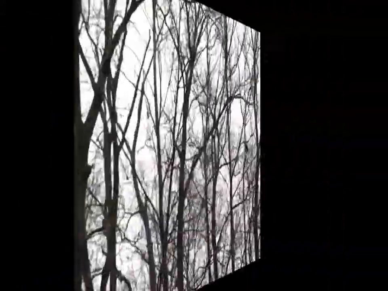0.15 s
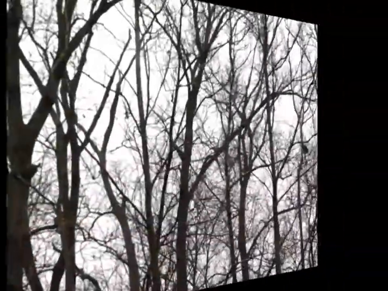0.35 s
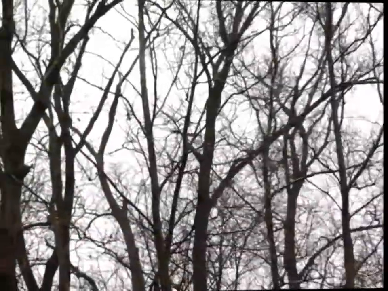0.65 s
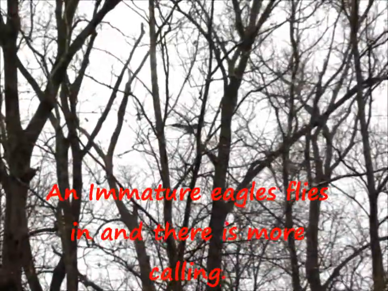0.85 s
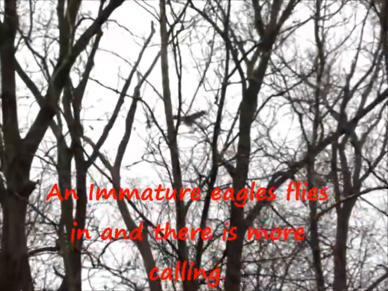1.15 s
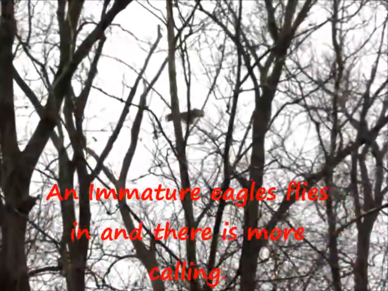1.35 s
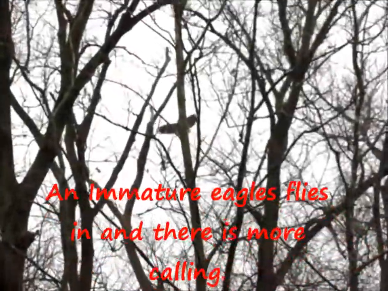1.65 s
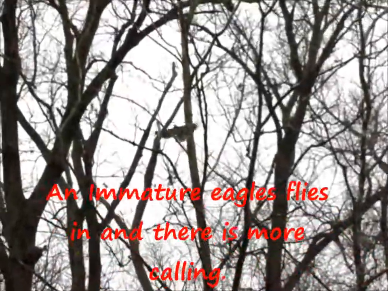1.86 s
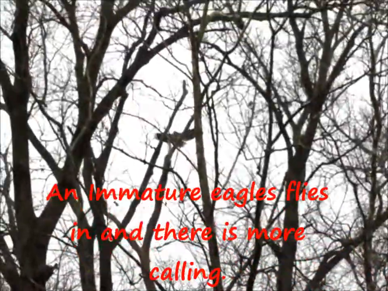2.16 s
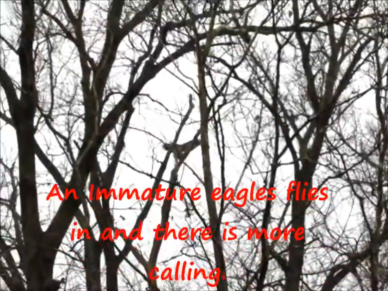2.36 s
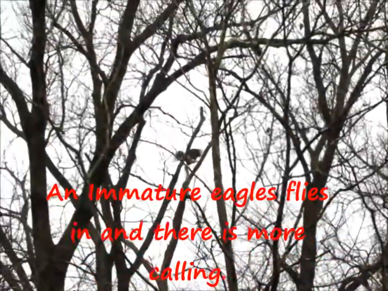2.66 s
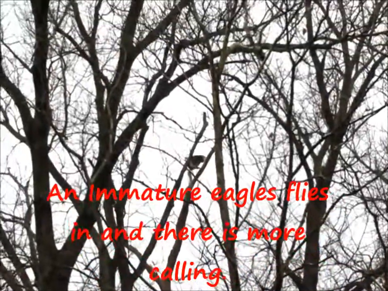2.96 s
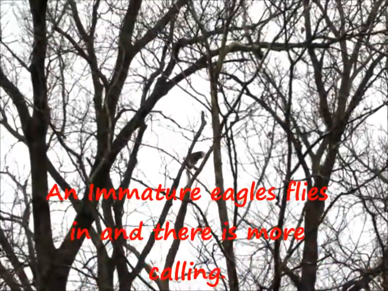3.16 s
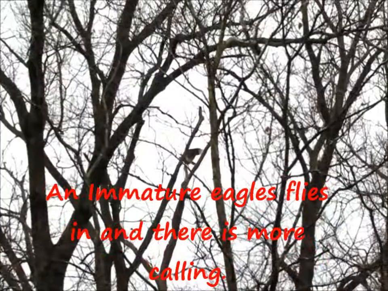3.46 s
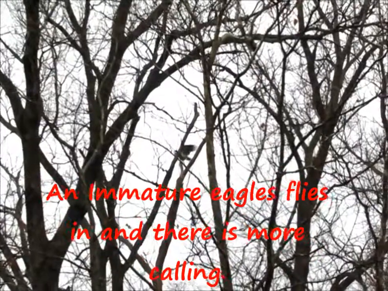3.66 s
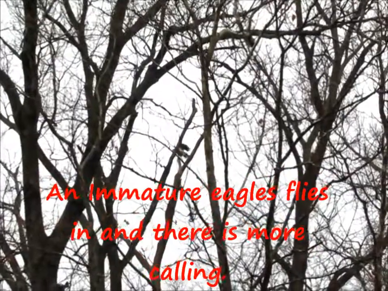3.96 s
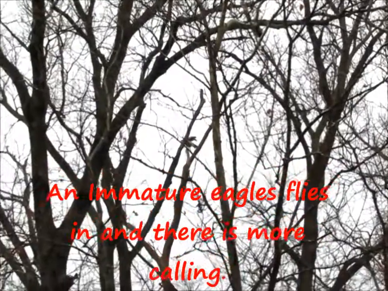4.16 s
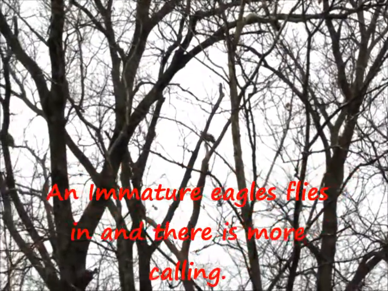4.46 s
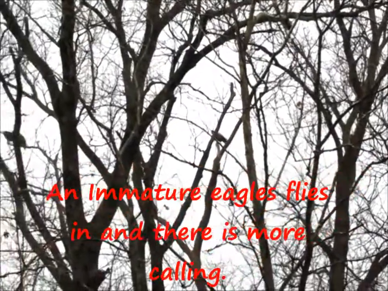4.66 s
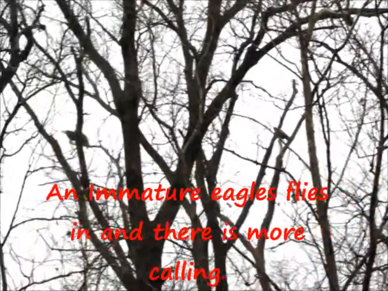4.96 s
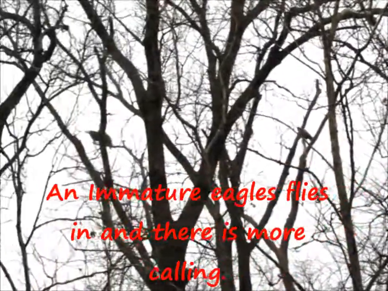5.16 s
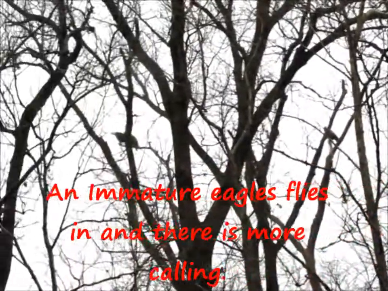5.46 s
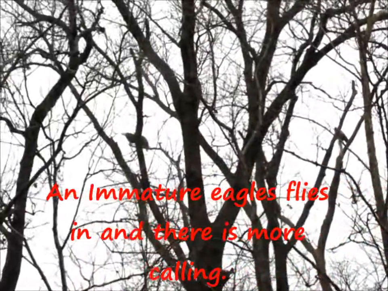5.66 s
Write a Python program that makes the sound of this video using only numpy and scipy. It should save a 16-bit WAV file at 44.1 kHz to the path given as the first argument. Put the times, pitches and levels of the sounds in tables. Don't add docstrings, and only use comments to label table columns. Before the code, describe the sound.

A broad, rushing motor whir starts at once, brightens at about 0.2 seconds and stops abruptly at 0.7, leaving a softer hiss until 1.6. An eagle's near-pure arched whistles, around 2 to 2.5 kHz, rise and fall at 0.2 and 0.7, then quicker broken strokes come around 1.0, 1.35 and 1.5, some led by low rising grace notes. Trunks return a diffuse, shimmering echo. Close dull knocks hit the hand-held camera from 1.2 to 1.8, with a sharp metallic click at 1.6; lighter bumps recur at 2.3 and between 4.1 and 5.3. Faint steady rain with fine drops and a low rumble remain. Quick high chatter runs from 2.45 to 2.85 and again from 3.9 to 4.5, pulses rising then dropping and weakening. A small bird chips faintly at 2.5 and near 4.0, followed by a thin falling buzz. Rain and rumble finish to 5.8.

```python
import sys
import numpy as np
from scipy import signal
from scipy.fft import rfft, irfft
from scipy.io import wavfile
from scipy.ndimage import uniform_filter1d

SR = 44100
rng = np.random.default_rng(int(sys.argv[2]) if len(sys.argv) > 2 else 0)


def to_wav(s):
    ch = np.atleast_2d(s).T
    pcm = np.round(np.clip(ch, -1, 1) * 32767)
    wavfile.write(sys.argv[1], SR, pcm.astype(np.int16))


def undo_db(level):
    steps = np.asarray(level, float) / 20
    return 10 ** steps


N = 256220

# pitch_hz, density_db (per Hz)
WHIR_SPECTRUM = [(35, -37), (60, -11), (102, -2), (152, -7), (521, -12), (810, -17), (1120, -10),
                 (1410, -0.5), (1830, -3), (3120, -4), (11700, -21.5), (13800, -59), (15500, -67)]
HISS_SPECTRUM = [(120, -50), (200, -12), (288, -9.5), (755, -7.5), (1170, -10.5), (1940, -2.5),
                 (2380, -4.5), (2850, -11), (11400, -17), (15500, -37)]
RAIN_SPECTRUM = [(120, -46), (200, 0), (211, -12.5), (273, -3), (470, -5.5), (812, -1.5), (1050, -4.5),
                 (1380, -4.5), (1940, -5), (2700, -8), (5790, -13.5), (14700, -21), (15500, -17)]
RUMBLE_SPECTRUM = [(16, -41), (28, -10), (49, -21), (59, -4), (102, -13.5), (120, 0.5), (139, -14),
                   (166, -7.5), (206, -16.5), (232, -20), (260, -18), (340, -40), (570, -120)]
# pitch_hz, width_hz, level_db
WHIR_PEAKS = [(830, 164, -46.5), (1476, 144, -44), (2250, 110, -50.5), (3030, 100, -50), (3840, 92, -53.5)]
RUMBLE_PEAKS = [(38.2, 14, -66.5), (86.2, 11, -57.5), (106.95, 1.8, -56.5)]
# time_s, level_db
WHIR_DB = [(0, -35), (.35, -35.5), (.7, -36), (.71, -50), (.72, -89)]
HISS_DB = [(0, -56), (.72, -46), (.9, -49), (1.2, -50.5), (1.6, -49.5), (1.61, -90)]
RAIN_DB = [(1.65, -58.5), (1.86, -59.5), (5.81, -60)]
RUMBLE_DB = [(0.0, -47.5), (0.69, -52.5), (0.76, -53.5), (2.75, -52.5), (5.74, -53.5), (5.81, -58)]
# pitch_hz, correlation (-1..1)
LIKENESS = [(60, 0.93), (130, 1), (290, 0.32), (640, 0.37), (1410, 0.31), (3100, -0.035), (6820, 0.15),
            (15000, -0.15)]

# time_s, pitch_hz, fundamental_db
ARCHES = [
    [(0.175, 2126, -41), (0.188, 2104, -32), (0.212, 2183, -40), (0.227, 2210, -32), (0.272, 2345, -25),
     (0.281, 2480, -33)],
    [(0.281, 2490, -30.5), (0.32, 2588, -36.5), (0.354, 2555, -30.5), (0.363, 2427, -29),
     (0.371, 2060, -29), (0.382, 1900, -35), (0.39, 1880, -46)],
    [(0.68, 1970, -37), (0.695, 2154, -37.5), (0.717, 2237, -27), (0.734, 2385, -23.5),
     (0.758, 2286, -25.5), (0.769, 2220, -35), (0.782, 1990, -30.5), (0.795, 1800, -41.5)],
    [(1.342, 2264, -41), (1.352, 2170, -33), (1.36, 2384, -25), (1.383, 2378, -26), (1.388, 2340, -23)],
]
# start_s, length_s, from_hz, to_hz, peak_db
SWELLS = [
    (1.021, 0.014, 2290, 2210, -39),
    (1.037, 0.0174, 2163, 2340, -22),
    (1.074, .026, 2444, 2357, -24),
]
BLOOMS = [
    (1.101, 0.0233, 2265, 1840, -28.5),
    (1.548, 0.031, 1988, 1902, -28),
]
SAGS = [
    (1.056, 0.019, 2443, 2410, -24.5),
    (1.388, 0.02, 2055, 1830, -32),
    (1.467, 0.036, 2034, 1960, -32.5),
]
CHATTER = [(2.464, 0.019, 2260, 2170, -30.5), (2.483, 0.021, 2366, 2154, -34.5),
           (2.539, 0.028, 2712, 2680, -33), (2.556, 0.022, 2725, 2710, -34), (2.577, 0.01, 2700, 2580, -37),
           (2.633, 0.016, 2678, 2665, -31.5), (2.65, 0.014, 2633, 2635, -33),
           (2.731, 0.034, 2167, 2146, -37), (2.762, 0.0074, 2120, 2100, -39),
           (2.825, 0.018, 1980, 1930, -38.5), (3.893, 0.049, 2143, 2268, -32),
           (3.99, 0.049, 2740, 2764, -37), (4.099, 0.018, 2690, 2716, -33),
           (4.117, .013, 2660, 2690, -34.5), (4.132, .015, 2710, 2590, -37.5),
           (4.221, 0.027, 2596, 2610, -37.5), (4.237, .014, 2285, 1930, -34),
           (4.341, 0.017, 2087, 2100, -31.5), (4.366, 0.012, 1870, 1920, -43),
           (4.478, 0.01, 1870, 1950, -40.5)]
# start_s, length_s, top_hz, peak_db
GRACES = [
    (0.64, 0.058, 1800, -37),
    (0.995, 0.035, 1720, -36.5),
    (1.32, 0.032, 1644, -37),
    (1.445, .024, 1640, -38),
    (1.529, .022, 1573, -40.5),
]
# length_share (0..1), level_db under the peak
SWELL = [(0, -15), (.3, -7), (.8, 0.5), (1, -6)]
BLOOM = [(0, -8), (.22, -4), (.62, 0.0), (1, -9)]
SAG = [(0, -4), (.3, 3), (.7, -8), (1, 0)]
GRACE = [(0, -5.5), (.2, -8), (.6, -1.5), (1, -7)]
PULSE = [(0, -6), (.22, 0.0), (.7, -6.5), (1, -18)]
# pitch_hz, level_db against the fundamental
THROAT = [(3100, 3), (3900, -18.5), (4750, -14.5), (5500, -4.5), (6050, -20), (6650, -9), (7500, -22),
          (10500, -17)]
# pitch_hz, left_right_db
SIDE_BY_PITCH = [(1500, -5), (1980, -1.5), (2220, 2), (2420, -2), (2700, -2.5)]

# start_s, thud_db, knock_db, tick_db, left_right_db
KNOCKS = [(1.167, -32, -41, -57, -7), (1.42, -43, -33, -37, -8), (1.598, -33, -40, -29, -1.5),
          (1.744, -33.5, -67, -62, -3), (1.808, -45, -56, -54, -2), (2.28, -44.5, -66, -45, -3),
          (4.141, -55, -49, -45, -1.0), (4.335, -55, -61, -50, -1.0), (4.69, -50.5, -54, -58, 1),
          (4.898, -43, -48, -52, -2), (5.344, -52, -48, -69, -6)]
# from_hz, to_hz, t60_s
BODY = [
    (161, 880, 0.054),
    (590, 1920, 0.026),
    (1380, 2170, 0.015),
    (3020, 16000, 0.009),
]
# pitch_hz, level_db, t60_s
SWITCH = (11000, -37, .012)

# start_s, pitch_hz, level_db
CLUCKS = [(2.449, 1760, -39.5), (2.454, 2030, -39.5), (2.63, 2350, -37.5), (2.728, 1770, -50),
          (2.824, 1690, -47), (3.88, 1750, -35), (3.886, 2000, -34), (3.988, 2450, -35.5),
          (3.993, 2250, -52), (4.095, 2280, -37.5), (4.214, 2000, -43), (4.218, 2215, -34.5)]
# start_s, length_s, from_hz, to_hz, peak_db
CHIPS = [
    (3.976, .008, 7000, 5600, -48),
    (2.517, .018, 4780, 5030, -55),
]
# length_s, from_hz, settles_hz, peak_db
BUZZ = (0.46, 9996, 7461.5, -55)
# length_share (0..1), level_db under the peak, side1_db, side2_db
BUZZ_EFFORT = [(0, -1, -14, -30), (.15, 5, -1, -9), (.55, -8, -1, -2), (.75, -23, -7, -3), (1, -19, -8, -4)]


def at_hz(points, hz):
    table_hz, values = np.array(points)[:, 0], np.array(points)[:, 1]
    return np.interp(np.log(hz + 1), np.log(table_hz), values)


def in_time(rows):
    return undo_db(np.interp(np.arange(N) / SR, *np.transpose(rows)))


def rms_one(x):
    return x / np.sqrt(np.mean(x ** 2) + 1e-20)


def drift(rate_hz, size=N):
    r = np.exp(-2 * np.pi * rate_hz / SR)
    noise = rng.standard_normal(size + SR)
    return rms_one(signal.lfilter([1], [1, -2 * r, r * r], noise)[SR:])


def filtered(x, cut_hz, kind):
    return signal.sosfilt(signal.butter(2, cut_hz, kind, fs=SR, output="sos"), x)


def coloured(spectrum, wider=0.68):
    hz = np.arange(N // 2 + 1) * SR / N
    alike = np.clip(at_hz(LIKENESS, hz), 0, 1) ** wider
    mid, side = rfft(rng.standard_normal((2, N))) * undo_db(at_hz(spectrum, hz))
    spectra = np.sqrt(1 + alike) * mid + np.sqrt(1 - alike) * side * [[1], [-1]]
    return rms_one(irfft(spectra, N))


def resonant(peaks, apart):
    out = np.zeros((2, N))
    for hz, width_hz, level_db in peaks:
        r = np.exp(-np.pi * width_hz / SR)
        poles = [1, -2 * r * np.cos(2 * np.pi * hz / SR), r * r]
        mid, side = signal.lfilter([1, 0, -1], poles, rng.standard_normal((2, N)))
        out += undo_db(level_db) * rms_one(mid + apart * side * [[1], [-1]])
    return out


def add(out, start_s, sound, pan_db):
    i = round(start_s * SR)
    out[:, i:i + sound.shape[-1]] += sound * undo_db(np.outer([.5, -.5], pan_db))


def span(rows):
    s, *columns = np.transpose(rows)
    t = np.arange(s[0], s[-1], 1 / SR)
    edge = np.clip(np.minimum(t - s[0], s[-1] - t) / .0015, 0, 1)
    return s[0], edge, [np.interp(t, s, c) for c in columns]


def strokes(table, breath, bend=1):
    return [[(s + a * length, from_hz + a ** bend * (to_hz - from_hz), peak_db + g) for a, g in breath]
            for s, length, from_hz, to_hz, peak_db in table]


def pure_tones(notes):
    out = np.zeros((2, N))
    for s, edge, (hz, db) in map(span, notes):
        tone = np.sin(2 * np.pi * np.cumsum(hz) / SR)
        add(out, s, np.sqrt(2) * edge * undo_db(db) * tone, -1.5)
    return out


def whir():
    sound = coloured(WHIR_SPECTRUM, wider=0.42) + undo_db(37.5) * resonant(WHIR_PEAKS, apart=0.26)
    sound = in_time(WHIR_DB) * sound
    up_s, ramp_s, muffled_db = 0.2, 0.045, -9.5
    treble_gain = in_time([(up_s - ramp_s / 2, muffled_db), (up_s + ramp_s / 2, 0)])
    high_pass = signal.butter(2, 8000, "high", fs=SR, output="sos")
    return sound - (1 - treble_gain) * signal.sosfiltfilt(high_pass, sound)


def hiss():
    return in_time(HISS_DB) * coloured(HISS_SPECTRUM, wider=0.84)


def drops():
    born = rng.random((2, N)) < 600 / SR
    strength_db = 4.2 * np.minimum(rng.exponential(1, (2, N)), 4)
    ticks = born * undo_db(strength_db) * rng.choice([-1, 1], (2, N))
    return rms_one(filtered(ticks + ticks[::-1], [500, 5000], "band"))


def rain():
    return in_time(RAIN_DB) * (undo_db(6.5) * coloured(RAIN_SPECTRUM) + undo_db(-5.5) * drops())


def rumble():
    return in_time(RUMBLE_DB) * (undo_db(-3.5) * coloured(RUMBLE_SPECTRUM)
                                 + undo_db(52.5) * resonant(RUMBLE_PEAKS, apart=0.11))


def eagle(notes, push_share, open_db, tilt_db):
    out, wobble, flutter = np.zeros((2, N)), drift(176), drift(154)
    grain = [drift(220) for k in range(3)]
    for rows in notes:
        s, edge, (hz, db) = span(rows)
        i = slice(round(s * SR), round(s * SR) + len(hz))
        phase = 2 * np.pi * np.cumsum(hz * (1 + 0.0064 * wobble[i])) / SR
        effort_db = db + 33
        upper = 0
        for k in range(3):
            level_db = at_hz(THROAT, (k + 2) * hz) + open_db + k * tilt_db
            level_db = level_db - 5 * np.abs(grain[k][i]) - push_share * effort_db
            upper = upper + undo_db(level_db) * np.sin((k + 2) * phase)
        glide = np.abs(np.gradient(hz)) * SR / 1000
        tone = np.sin(phase) + undo_db(-.8 * np.clip(glide - 21, 0, None)) * upper
        swell = uniform_filter1d(undo_db(db), size=60)
        sound = np.sqrt(2) * edge * swell * undo_db(1.3 * flutter[i]) * tone
        add(out, s, sound, at_hz(SIDE_BY_PITCH, hz.mean()))
    return out


def wood(x, t60_s, level_db, shimmer_db):
    t = np.arange(SR) / SR
    onset = np.clip((t - .006) / 0.0013, 0, 1)
    tail = rng.standard_normal((3, SR)) * onset * undo_db(-60 * t / t60_s)
    tail = tail[0] + 1.25 * tail[1:]
    wet = signal.fftconvolve(x, tail / np.sqrt(np.sum(tail ** 2) / 2), axes=1)[:, :N]
    return wet * undo_db(level_db + shimmer_db * drift(90))


def whistles():
    short = ARCHES[3:] + strokes(SWELLS, SWELL) + strokes(BLOOMS, BLOOM) + strokes(SAGS, SAG)
    graces = strokes([(s, length, 1330, top_hz, db) for s, length, top_hz, db in GRACES], GRACE, bend=0.78)
    calls = eagle(ARCHES[:3], push_share=0.45, open_db=-0.28, tilt_db=-2.5)
    calls += eagle(short, push_share=.85, open_db=-1.5, tilt_db=-3.5)
    calls += eagle(graces, push_share=0.058, open_db=1.4, tilt_db=0.26)
    return calls + wood(calls, t60_s=0.96, level_db=-11.5, shimmer_db=0.0)


def knocks():
    out, t = np.zeros((2, N)), np.arange(SR // 16) / SR
    for s, *levels, pan_db in KNOCKS:
        contact = rng.standard_normal((2, len(t))) * np.clip(t / 0.00078, 0, 1)
        contact = contact[0] + 0.88 * contact
        crack_db = levels[-1] - 6
        for db, (low_hz, high_hz, t60_s) in zip(levels + [crack_db], BODY):
            part = filtered(contact * undo_db(-60 * t / t60_s), [low_hz, high_hz], "band")
            add(out, s, undo_db(db + 6.0) * part / np.abs(part).max(), pan_db)
    hz, db, t60_s = SWITCH
    add(out, 1.5995, undo_db(db - 60 * t / t60_s) * np.sin(2 * np.pi * hz * t), -1.5)
    return out


def clucks():
    table = [(s, 0.0073, hz, hz * (1 + 0.03), db) for s, hz, db in CLUCKS]
    return pure_tones(strokes(table, [(0, 0), (1, -1.5)]))


def chips():
    return pure_tones(strokes(CHIPS, BLOOM))


def chatter():
    calls = eagle(strokes(CHATTER, PULSE), push_share=-0.05, open_db=-0.65, tilt_db=-4.5)
    calls += clucks() + chips()
    return calls + wood(calls, t60_s=0.89, level_db=-9, shimmer_db=3.8)


def songbird():
    out = np.zeros((2, N))
    length, from_hz, rest_hz, peak_db = BUZZ
    rows = [(4.03 + a * length, peak_db + g, *sides) for a, g, *sides in BUZZ_EFFORT]
    s, edge, (db, *sides_db) = span(rows)
    settle = np.exp(-np.arange(len(db)) / SR / 0.016)
    hz = rest_hz + (from_hz - rest_hz) * settle
    phase = 2 * np.pi * np.cumsum(hz + 60 * drift(115, size=len(hz))) / SR
    beat = 2 * np.pi * np.cumsum(580 + 130 * drift(154, size=len(hz))) / SR
    tone = np.sin(phase)
    for k, side_db in enumerate(sides_db):
        tone += undo_db(side_db) * np.sin(phase + (k + 1) * beat)
    add(out, s, np.sqrt(2) * edge * undo_db(db) * tone, -1.5)
    return out + wood(out, t60_s=0.26, level_db=-1, shimmer_db=0.5)


def scene():
    steady = whir() + hiss() + rain() + rumble()
    return steady + whistles() + knocks() + chatter() + songbird()


def low_pass(x):
    return signal.sosfilt(signal.butter(12, 15630, fs=SR, output="sos"), x)


def record(dry):
    dull = signal.sosfilt(signal.butter(4, 14000, fs=SR, output="sos"), dry)
    dull = signal.sosfilt(signal.cheby2(10, 50, 16000, fs=SR, output="sos"), dull)
    return low_pass(dull)


dry = scene()
out = record(dry)
to_wav(out)
```